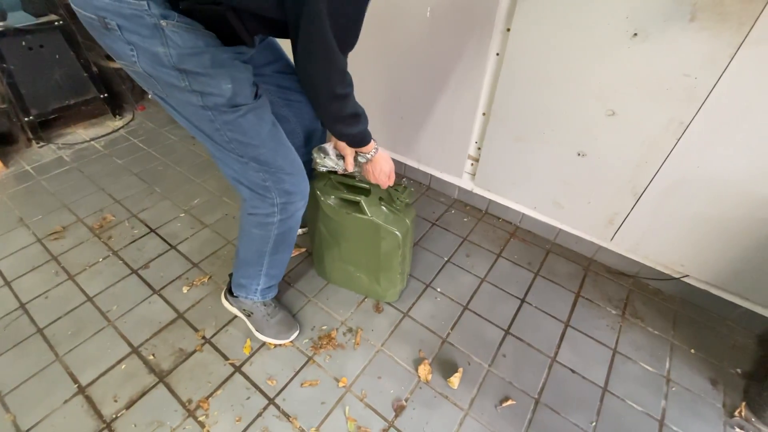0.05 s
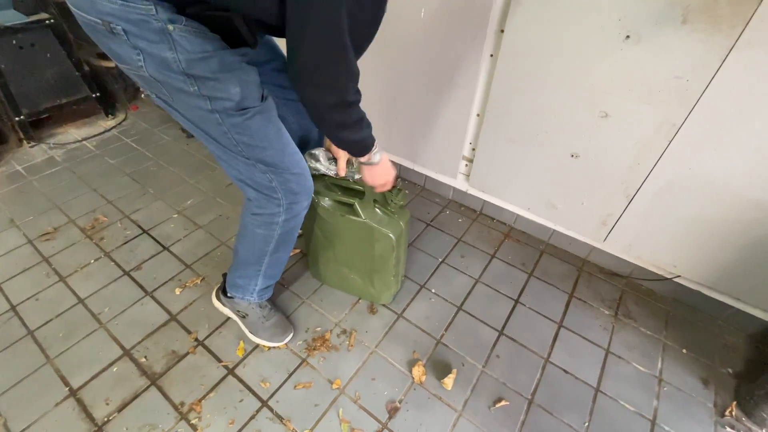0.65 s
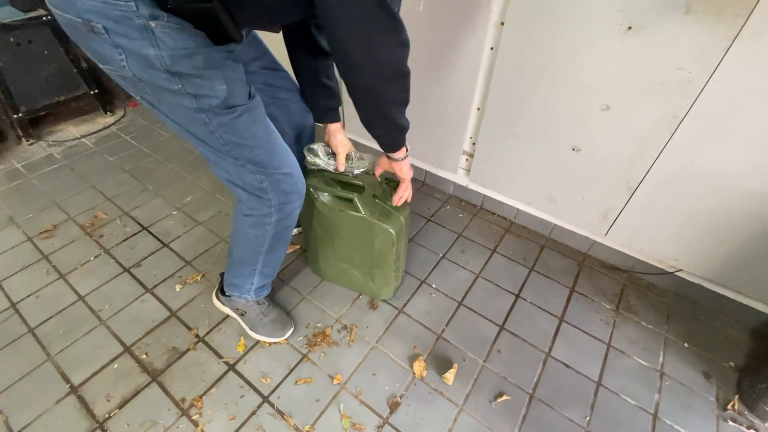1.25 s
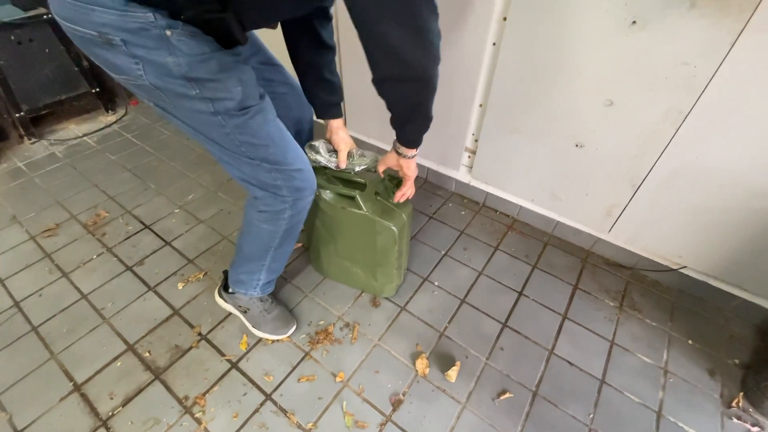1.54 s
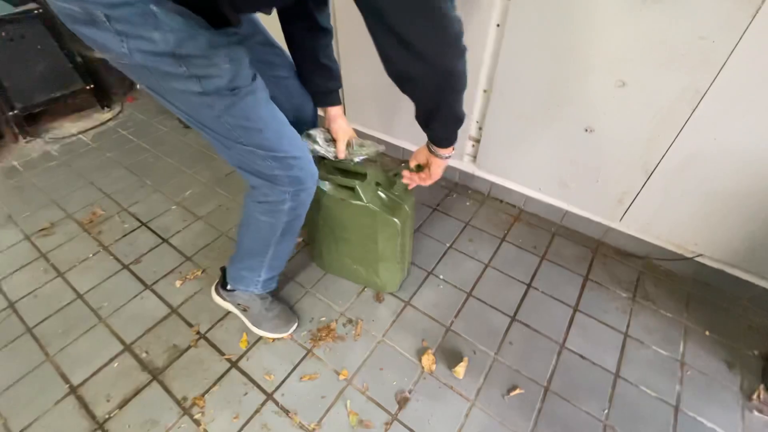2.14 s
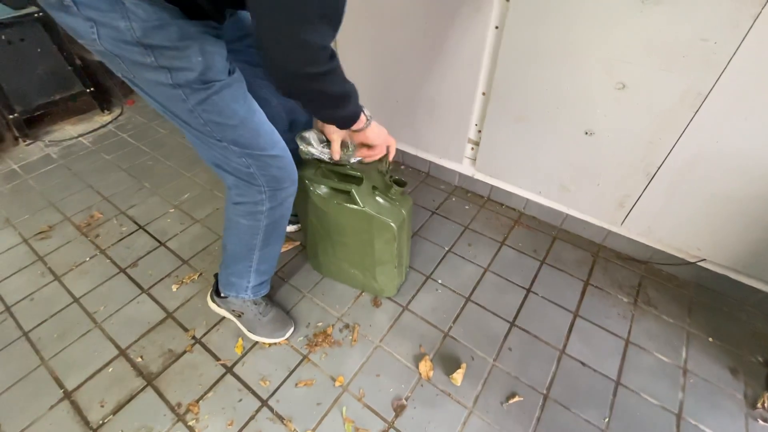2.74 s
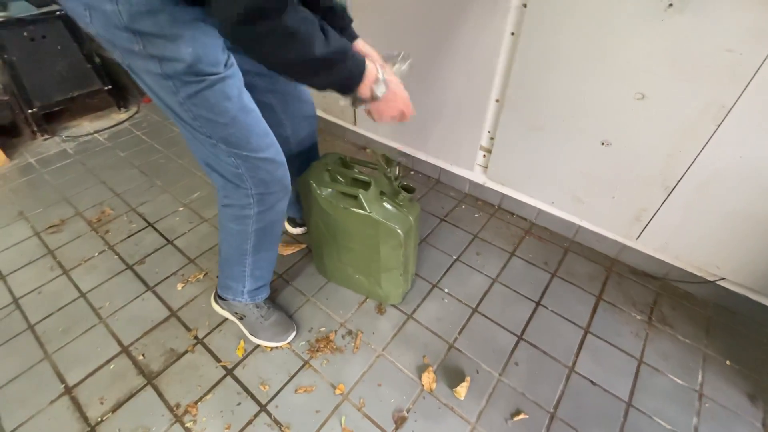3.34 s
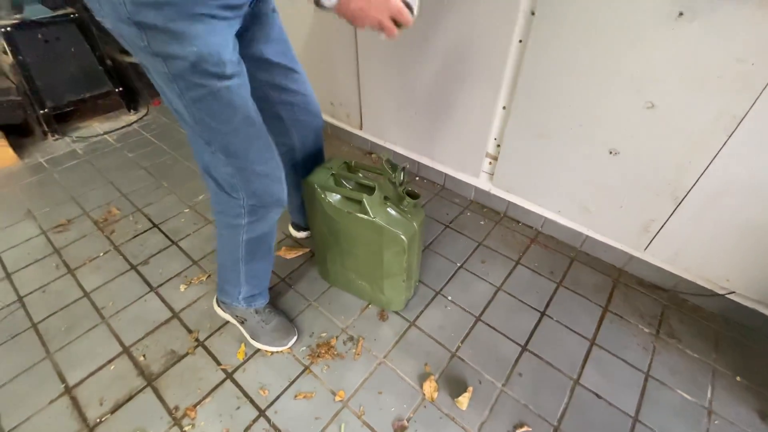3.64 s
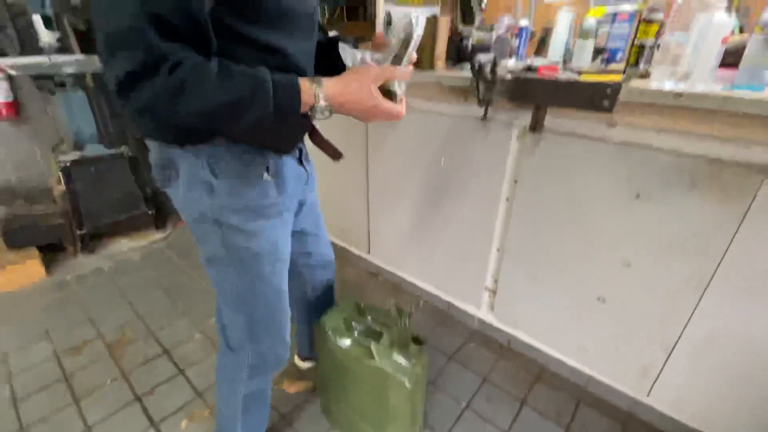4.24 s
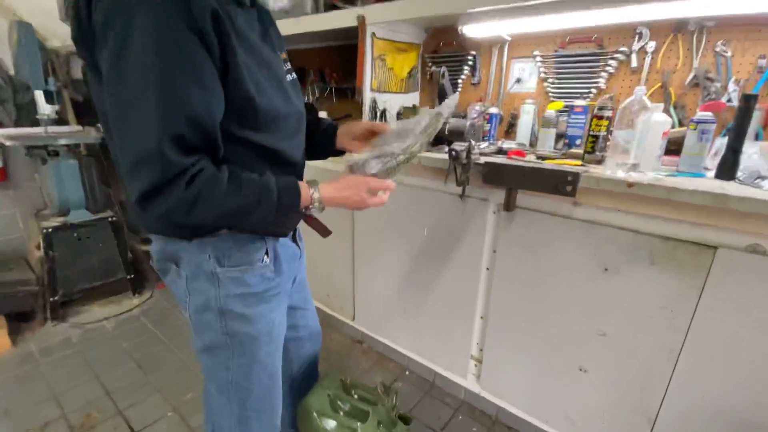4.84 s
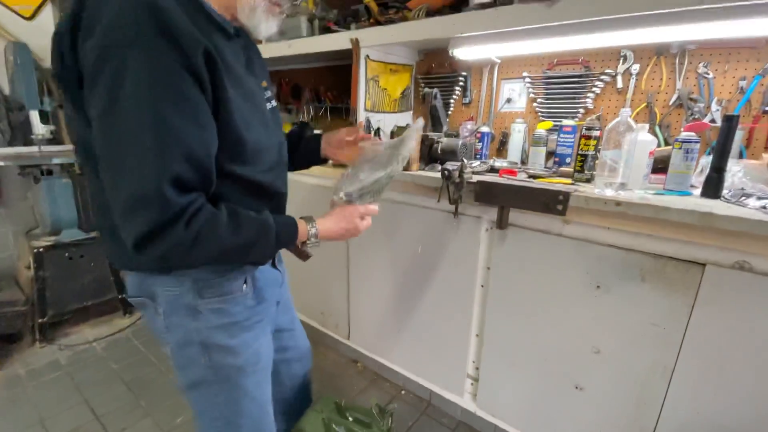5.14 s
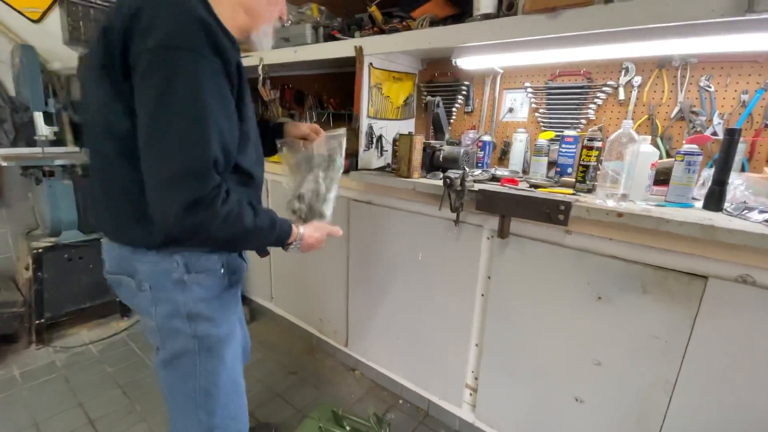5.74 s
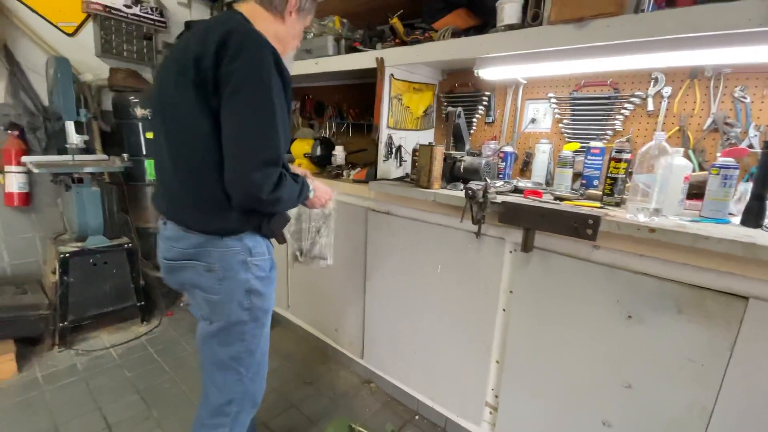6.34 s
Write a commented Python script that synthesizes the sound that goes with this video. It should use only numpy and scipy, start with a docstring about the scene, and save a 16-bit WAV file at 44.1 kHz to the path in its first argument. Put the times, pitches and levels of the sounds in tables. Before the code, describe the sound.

In a quiet tiled workshop, heard from close by, dull bumps and light metallic rattles give way to a few thin squeaks from a jerry can's latch. A short sputtering hiss runs straight into one very loud steel clank that booms and rings away. The loose cap knocks again, more lightly, and the rest is quiet, irregular crinkling and snapping of a thin plastic bag over a faint low room rumble.

```python
"""Opening a steel jerry can

In a tiled workshop with a low rumble, the latch is worked loose with small knocks and thin squeals.
The cap pops, vapour rushes out and the can's wall snaps back with a loud, ringing clank that makes
the limiter turn the sound down. The cap knocks again, then a plastic bag is picked up and crinkles."""
import sys
import numpy as np
from scipy import signal
from scipy.fft import rfft, irfft
from scipy.io import wavfile
from scipy.ndimage import uniform_filter1d, minimum_filter1d

SR = 44100
rng = np.random.default_rng(int(sys.argv[2]) if len(sys.argv) > 2 else 0)


def store_wav(level_fs):
    """Save 16-bit WAV to argv[1]."""
    pcm = np.round(np.clip(np.atleast_2d(level_fs), -1, 1) * 32767)
    wavfile.write(sys.argv[1], SR, pcm.T.astype(np.int16))


N = 285754
T = np.arange(N) / SR


def undb(db):
    """Turn decibels into a gain. Table levels are relative: each source applies its own gain too."""
    return 10 ** (np.asarray(db) / 20)


def unit(x):
    """Scale a signal to an average strength (rms) of 1."""
    return x / np.sqrt(np.mean(x ** 2))


def fade(t, t60):
    """Die away by 60 dB in t60 seconds: the 'fade time' in the tables."""
    return np.exp(-np.log(1000) * t / t60)


def rise(t, rise_s):
    """Grow from 0 towards 1, quickly at first."""
    return 1 - np.exp(-t / rise_s)


def envelope(start, rise_s, hold_s, t60):
    """A loudness shape that rises evenly, holds, then dies away."""
    return np.clip((T - start) / rise_s, 0, 1) * fade(np.maximum(T - start - rise_s - hold_s, 0), t60)


def overlap(gains):
    """The joint gain of unrelated sounds: their powers add up."""
    return np.sqrt(np.sum(np.square(gains), axis=0))


def wobble(n, smooth):
    """A random wiggle, averaged over `smooth` samples: more makes it slower."""
    return unit(uniform_filter1d(rng.standard_normal(n), size=smooth))


def look_up(table, hz, column=1):
    """Read between the rows of a table, on a log-frequency scale."""
    rows = np.array(table)
    return np.interp(np.log(hz + 1e-9), np.log(rows[:, 0]), rows[:, column])


def colour(x, table):
    """Shape the tone with a curve of (frequency [Hz], level [dB]) points."""
    n = x.shape[-1]
    return irfft(rfft(x) * undb(look_up(table, np.fft.rfftfreq(n, 1 / SR))), n)


def add(out, start, x):
    """Mix a sound in at a start time in seconds."""
    i = max(0, int(start * SR))
    out[..., i:i + x.shape[-1]] += x[..., :N - i]


def from_left(x, lag_s=0.00045):
    """Make stereo: sound from the left reaches the right microphone later."""
    return np.array([x, np.pad(x, (int(lag_s * SR), 0))[:len(x)]])


def stereo_noise(n, apart_hz):
    """Noise that is alike on both sides in the bass and mostly unrelated above apart_hz."""
    angle = np.arctan(0.43 + np.fft.rfftfreq(n, 1 / SR) / apart_hz)
    shared = rfft(from_left(rng.standard_normal(n)))
    separate = rfft(rng.standard_normal((2, n)))
    return irfft(np.cos(angle) * shared + np.sin(angle) * separate, n)


def shaped_noise(table, apart_hz, n=N):
    """Stereo noise with the tone of a table, at strength 1."""
    return unit(colour(stereo_noise(n, apart_hz), table))


def dense_ring(table, apart_hz):
    """Countless ringing tones blur into bands of noise, each fading at its own rate."""
    t = T[:2 * SR]
    spectrum = rfft(shaped_noise(table, apart_hz, len(t)))
    hz, centres = np.fft.rfftfreq(len(t), 1 / SR), np.geomspace(50, 15000, 18)
    return sum(irfft(spectrum * np.interp(hz, centres, band)) * fade(t, look_up(table, centre, column=2))
               for centre, band in zip(centres, np.eye(len(centres))))


def steel_tones(table, wander_hz):
    """Fading tones that waver as thin steel flexes; they are complex, and .imag gives the sound."""
    t, knots = T[:3 * SR], np.arange(0, 3, 0.025)
    tones = []
    for hz, db, t60 in table:
        drift = np.cumsum(np.interp(t, knots, rng.standard_normal(len(knots)))) / SR
        tones.append(undb(db) * np.exp(2j * np.pi * (hz * t + wander_hz * drift)) * fade(t, t60))
    return np.array(tones)


def strike(tones):
    """Where a blow lands sets each tone's phase, a little differently at each microphone."""
    phases = rng.uniform(0, 2 * np.pi, len(tones)) + 0.82 * rng.standard_normal((2, len(tones)))
    left, right = np.imag(np.exp(1j * phases) @ tones)
    return np.array([left, from_left(right)[1]])


# the tone of the room's rumble: (frequency [Hz], level [dB])
RUMBLE_TONE = [(20, -39), (35, -13), (58, 0), (85, -9), (120, -10.5), (180, -9.5), (245, -7.5), (400, -11),
               (700, -11.5), (1200, -16.5), (2600, -25), (7500, -33.5), (9500, -35), (11500, -44),
               (14000, -62)]
# electric hum: (pitch [Hz], level [dB])
HUM_TONES = [(120, -63), (240, -61.5)]

def background(rumble_db=-52, swell_db=1):
    """A low, gently swelling rumble with a little mains hum."""
    swell = unit(colour(rng.standard_normal(N), [(3, 0), (12, -40), (50, -120)]))
    hum = sum(undb(db) * np.sin(2 * np.pi * hz * T) for hz, db in HUM_TONES)
    return shaped_noise(RUMBLE_TONE, apart_hz=690) * undb(rumble_db + swell_db * swell) + hum


# the room's echo: (frequency [Hz], level [dB], fade time [s])
ECHO_BANDS = [(60.5, -8.5, 0.58), (503, 4.5, 0.18), (1950, 2.5, 0.341), (6560, 3, 0.46),
              (14400, 4.5, 0.031)]

def workshop(x, echo_db):
    """Tiles and cupboard doors add a short echo."""
    echo = dense_ring(ECHO_BANDS, apart_hz=493) * (T[:2 * SR] > 0.004)  # arrives after 4 ms
    echo = echo / np.sqrt(np.sum(echo ** 2) / 2)
    return x + undb(echo_db) * signal.fftconvolve(x, echo, axes=1)[:, :N]


# shifts of body weight: (time [s], rise [s], hold [s], level [dB])
WEIGHT_SHIFTS = [(0.0, 0.07, 0.15, -40.5), (0.204, 0.0324, 0.172, -39), (0.506, 0.051, 0.443, -44.5),
                 (1.089, 0.04, 0.03, -41.5), (1.253, 0.026, 0.43, -44.5), (2.965, 0.056, 0.31, -46),
                 (3.652, 0.045, 0.03, -53), (5.45, 0.11, 1, -54.5)]
# their dull tone: (frequency [Hz], level [dB])
THUD_TONE = [(25, -28), (50, 16.5), (85, 11), (135, 20), (190, 3), (250, 19), (400, -30)]

def shifting_weight(gain_db=-4, t60=0.66):
    """Shoes and knees press on the floor and the can, making dull rumbles."""
    weight = overlap([undb(db) * envelope(start, rise_s, hold_s, t60)
                      for start, rise_s, hold_s, db in WEIGHT_SHIFTS])
    return shaped_noise(THUD_TONE, apart_hz=910) * weight * undb(gain_db)


# grips and folds of the bag: (time [s], rise [s], hold [s], crinkle level [dB], sleeve level [dB])
BAG_MOVES = [(3.257, 0.018, 0.0113, -76, -62), (3.368, 0.0096, 0.25, -62.5, -54.5),
             (3.696, 0.017, 0.3, -55, -52), (4.07, 0.017, 0.013, -48.5, -45),
             (4.269, 0.017, 0.043, -57, -55), (4.45, 0.01, 0.32, -65, -80),
             (4.738, 0.073, 0.036, -47.5, -47), (4.937, 0.0185, 0.034, -63.5, -73),
             (5.402, 0.04, 0.059, -51.5, -48.5), (5.561, 0.0114, 0.04, -55.5, -52),
             (5.714, 0.012, 0.092, -57, -53.5), (5.884, 0.015, 0.034, -64, -55),
             (6.1, 0.0086, 0.022, -53, -48.5), (6.237, 0.024, 0.043, -69, -52),
             (6.434, 0.037, 0.03, -70, -50.5)]
# the tone of thin plastic: (frequency [Hz], level [dB])
PLASTIC_TONE = [(500, -30), (1300, 0), (2200, -0.5), (3000, 0.5), (4500, -6.5), (7000, -2.5), (10000, -3.5),
                (13000, -3.5), (15000, -32)]
# the tone of rustling sleeves: (frequency [Hz], level [dB])
SLEEVE_TONE = [(100, 18), (250, -1), (700, 8.5), (1300, 3), (2500, -7), (5000, -11)]

def bag(creases_per_s=450, crinkle_db=-2, slide_db=-11, sleeve_db=-2):
    """As the hands move, creases of many pitches and sizes snap at random; plastic and sleeves slide."""
    flexing = overlap([undb(db) * envelope(start, rise_s, hold_s, t60=0.42)
                       for start, rise_s, hold_s, db, _ in BAG_MOVES])
    rubbing = overlap([undb(db) * envelope(start, rise_s, hold_s, t60=0.28)
                       for start, rise_s, hold_s, _, db in BAG_MOVES])
    creases, pitches = np.zeros((2, N)), np.geomspace(1500, 13000, 16)
    for hz in pitches:
        sizes = undb(3 * np.minimum(rng.exponential(size=N), 3))
        snapping = rng.random(N) < creases_per_s / len(pitches) / SR
        kicks = sizes * snapping * rng.choice([-1, 1], N)
        ring = signal.lfilter(*signal.iirpeak(hz, Q=8, fs=SR), kicks)
        creases += np.array([ring, np.roll(ring, rng.integers(5, 25))])  # later on the right
    crinkle = undb(crinkle_db) * unit(colour(creases, PLASTIC_TONE))
    slide = undb(slide_db) * shaped_noise(PLASTIC_TONE, apart_hz=2000)
    sleeves = undb(sleeve_db) * shaped_noise(SLEEVE_TONE, apart_hz=850)
    return (crinkle + slide) * flexing + sleeves * rubbing


# the bag's larger creases: (time [s], level [dB], pitch [Hz])
CREASE_POPS = [(3.477, -42.5, 3020), (3.552, -47, 3690), (3.588, -51, 3000), (3.68, -46, 3050),
               (3.722, -39, 3220), (3.786, -43, 2770), (3.796, -46, 3920), (3.844, -43.5, 4640),
               (3.9594, -39, 2970), (4.042, -41, 3000), (4.067, -49, 2600), (4.09, -38.5, 3010),
               (4.1365, -49, 2900), (4.821, -36, 3050), (5.306, -48, 2500), (5.3144, -51, 1910),
               (5.322, -46, 2970), (5.4324, -38, 2860), (5.456, -56, 3300), (5.812, -47, 2920)]

def bag_pops():
    """A crease flips over and the plastic around it rings briefly."""
    out, t = np.zeros((2, N)), T[:SR // 10]
    shape = rise(t, 0.00099) * fade(t, 0.025)
    for start, db, hz in CREASE_POPS:
        ring = signal.lfilter(*signal.iirpeak(hz, Q=4, fs=SR), stereo_noise(len(t), apart_hz=9000))
        add(out, start, undb(db) * unit(ring) * shape)
    return out


# small clicks of latch and bag: (time [s], edge level [dB], crackle level [dB])
CLICKS = [(0.226, -46, -56), (0.625, -47, -59), (0.9694, -47, -58), (0.983, -45, -54.5), (2.136, -50, -64),
          (2.2145, -51.5, -60), (2.7391, -54, -55.5), (2.779, -53, -55), (2.861, -42, -48.5),
          (2.88, -49, -44), (3.083, -58, -59), (3.275, -63, -59), (3.3821, -44, -55.5), (3.42, -42, -55),
          (3.5524, -52, -58), (3.614, -32.5, -68), (3.721, -53, -51.5), (3.845, -50, -65),
          (3.896, -51, -49.5), (3.961, -44, -49.5), (4.0815, -33, -56), (4.137, -38, -54.5),
          (4.466, -50, -54), (4.628, -39.5, -55), (4.737, -52, -51), (4.784, -47, -59),
          (5.3884, -43.5, -54), (5.518, -38, -58), (5.72, -43, -51.5), (5.9045, -51.5, -64),
          (5.918, -48, -53), (6.0754, -46, -63), (6.113, -45, -65)]
# the tone of the crackle, and of the hinge's hiss below: (frequency [Hz], level [dB])
CRACKLE_TONE = [(600, -9), (1500, -4.5), (3000, 0.5), (5000, -1.5), (9000, -2.5), (14000, -13)]

def clicks(edge_gain_db=1, crackle_gain_db=5.5):
    """Latch and bag give single snaps: a very short bright edge with a brief crackle."""
    out, t = np.zeros((2, N)), T[:SR // 10]
    for start, edge_db, crackle_db in CLICKS:
        crackle = shaped_noise(CRACKLE_TONE, apart_hz=4000, n=len(t)) * fade(t, 0.05)
        edge = unit(np.diff(rng.standard_normal((2, len(t))), prepend=0)) * fade(t, 0.023)
        snap = undb(crackle_db + crackle_gain_db) * crackle + undb(edge_db + edge_gain_db) * edge
        add(out, start, snap * rise(t, 0.00062))
    return out


# swings of the cap on its hinge: (time [s], rise [s], hold [s], level [dB])
HINGE_SWINGS = [(0.42, 0.006, 0.02, -61), (1.805, 0.012, 0.012, -34.5), (2.21, 0.006, 0.01, -63)]

def hinge_scrapes():
    """Steel slides on steel in the hinge with a short hiss."""
    rubbing = overlap([undb(db) * envelope(start, rise_s, hold_s, t60=0.27)
                       for start, rise_s, hold_s, db in HINGE_SWINGS])
    return shaped_noise(CRACKLE_TONE, apart_hz=3000) * rubbing


# pushes on the latch: (time [s], length [s], top base pitch [Hz], time to the top [s],
# pitch lost by the end [share], level [dB], pitch shake at the end [share])
LATCH_PUSHES = [(0.733, 0.19, 1003, 0.085, 0.035, -51, 0.012),
                (1.093, 0.24, 1027, 0.054, 0.102, -47.5, 0.025),
                (1.482, 0.18, 987, 0.091, 0.078, -48.5, 0.03),
                (2.288, 0.28, 992, 0.067, 0.033, -54.5, 0.056)]
# the tones in a squeal: (pitch [times the base], level [dB], loudest point [share of the length],
# how much of the pitch slide it follows [share])
SQUEAL_TONES = [(2, -14.5, 0.57, 1), (3, -10.5, 0.31, 0.5076), (4, -5, 0.27, 1), (5, -25, 0.82, 0.31),
                (8, -13.5, 0.26, 1)]

def latch_squeal(gain_db=-2, rasp_db=4, rise_s=0.012, t60=0.12):
    """Thin whistles climb, then sag; as the grip slackens they roughen and a second whistle splits off."""
    out = np.zeros(N)
    for start, length_s, top_hz, top_s, sag, db, shake in LATCH_PUSHES:
        now = (T > start) & (T < start + length_s + t60)
        t = T[now] - start
        progress = np.minimum(t / length_s, 1)
        climbing = 0.0344 * np.maximum(1 - t / top_s, 0) ** 2
        sagging = sag * np.clip((t - top_s) / (length_s - top_s), 0, 1.1) ** 1.5
        below_top = climbing + sagging
        loudness = undb(db + gain_db) * envelope(start, rise_s, length_s - rise_s, t60)[now]
        # each whistle: (pitch lift [share], gain)
        first, second = (0, 1), (0.06 * progress ** 3, undb(-4) * progress ** 2)
        for lift, gain in (first, second):
            jitter = shake * (0.25 + 0.75 * progress ** 2) * wobble(len(t), smooth=110)
            for multiple, tone_db, loudest, follows in SQUEAL_TONES:
                hz = multiple * top_hz * (1 - follows * (below_top - lift) + jitter)
                tone = undb(tone_db) * np.sin(2 * np.pi * np.cumsum(hz) / SR)
                rasp = unit(undb(rasp_db * wobble(len(t), smooth=400)))
                swell = np.exp(-((progress - loudest) / 0.36) ** 2)
                out[now] += gain * loudness * swell * rasp * tone
    return from_left(out)


# the tone of rubbing steel: (frequency [Hz], level [dB])
RUB_TONE = [(1500, -8), (2200, -12), (2600, -17.5), (3000, -1), (3400, -17), (3900, 3), (4200, -6),
            (4600, -17), (5200, -13.5), (6800, -14), (7800, -12.5), (9500, -27.5)]

def latch_rub(gain_db=-9):
    """Under each squeal the steel rubs with a breathy rasp that grows through the push."""
    pushes = overlap([undb(db + gain_db) * envelope(start, 0.8 * length_s, 0.2 * length_s, t60=0.27)
                      for start, length_s, _, _, _, db, _ in LATCH_PUSHES])
    return shaped_noise(RUB_TONE, apart_hz=3000) * pushes


# the latch lever jolts against its mounts: (time [s], level [dB])
LEVER_JOLTS = [(0.214, -43), (0.27, -46.5), (0.323, -43.5), (0.418, -34.5), (0.464, -41), (0.497, -37.5),
               (2.841, -45)]
# the ring of the lever and the can's shoulder: (pitch [Hz], level [dB], fade time [s])
LEVER_TONES = [(128.5, -17, 0.37), (166, -5, 1.1), (258.6, -8, 1.1), (641, -11, 0.64), (1044, -3, 0.2),
               (1118, -9.5, 0.24), (1412, -12.5, 0.39), (1507, -18.5, 0.51), (1760, -17.5, 0.68),
               (1830, -19.5, 0.5), (1911, -15.5, 0.57), (2110, -18, 0.42), (2180, -13, 0.35),
               (2257, -20, 0.21)]

def latch_lever():
    """Each jolt rings the lever and thumps the shoulder of the can that carries it."""
    out, tones = np.zeros((2, N)), steel_tones(LEVER_TONES, wander_hz=5)
    for start, db in LEVER_JOLTS:
        add(out, start, undb(db) * strike(tones))
    return out


# the loose cap hits the can's neck: (time [s], level [dB])
CAP_HITS = [(0.217, -51), (0.419, -31), (0.448, -43), (0.495, -36), (1.81, -17), (1.857, -8), (1.884, -4.5),
            (1.902, -16), (1.94, -27), (1.972, -23), (2.017, -27), (2.05, -31), (2.185, -37), (2.221, -28),
            (2.254, -26), (2.413, -35.5), (2.882, -25), (2.889, -32), (2.91, -44), (2.923, -30),
            (2.937, -30)]
# the tone of one clack: (frequency [Hz], level [dB])
CLACK_TONE = [(100, -6), (240, 8), (520, 1.5), (850, 9.5), (1100, 6), (1400, -22), (2200, -25), (3200, -42),
              (5500, -45), (10000, -58)]

def cap_clacks(gain_db=1):
    """The cap chatters on its hinge; each hit is a short, dry burst of noise."""
    out, t = np.zeros((2, N)), T[:SR // 5]
    shape = rise(t, 0.00043) * fade(t, 0.026)
    for start, db in CAP_HITS:
        burst = shaped_noise(CLACK_TONE, apart_hz=2510, n=len(t))
        add(out, start, undb(db + gain_db) * burst * shape)
    return out


# spurts of vapour as the cap lifts: (time [s], level [dB], fade time [s])
SPURTS = [(1.661, -18, 0.17), (1.721, -20.5, 0.26)]
# the tone of the jet: (frequency [Hz], level [dB])
JET_TONE = [(100, -32), (400, 0), (720, 8.5), (1300, -7.5), (2600, -8), (4300, -16), (5800, -11),
            (8000, -11.5), (12000, -13), (14000, -20)]

def vapour(rise_s=0.0037, empty_at_s=1.772, flutter_db=3, gulp_db=-22.5, high_hz=299.4, low_hz=161.2):
    """A sputtering jet leaves the neck, with an unsteady gulp that sinks as the pressure falls."""
    start = SPURTS[0][0]
    pressure = envelope(start, rise_s, empty_at_s - start, t60=0.22)
    spurts = overlap([undb(db) * envelope(time, rise_s, 0, t60) for time, db, t60 in SPURTS])
    flutter = undb(flutter_db * wobble(N, smooth=120))
    jet = shaped_noise(JET_TONE, apart_hz=3000) * flutter * spurts * pressure
    gulp_hz = low_hz + (high_hz - low_hz) / (1 + ((T - start) / 0.039) ** 6)  # halfway down in 39 ms
    gulp_hz *= 1 + 0.09 * wobble(N, smooth=250)
    sputter = undb(flutter_db * wobble(N, smooth=400))
    gulp = unit(sputter * np.sin(2 * np.pi * np.cumsum(gulp_hz) / SR))
    gulp *= undb(gulp_db) * envelope(start, rise_s=0.021, hold_s=0.0427, t60=0.75)
    return jet + from_left(gulp)


# low swings of the can's broad side: (time [s], pitch [Hz], level [dB], fade time [s])
BOOM_SWINGS = [(1.803, 84.7, -28, 3.4), (2.131, 83.6, -31, 0.95), (2.2, 125, -31.5, 0.9),
               (2.201, 142.3, -32.5, 0.65), (2.199, 221.5, -39.5, 1), (2.199, 256.7, -38.5, 0.86)]

def wall_boom(waver_db=3, rise_s=0.084):
    """The broad side booms after the snap and again as it settles, dying away unevenly."""
    out = np.zeros(N)
    for start, *swing in BOOM_SWINGS:
        tone = steel_tones([swing], wander_hz=2).imag[0]
        noise = rng.standard_normal(len(tone))
        waver = unit(colour(noise, [(1, -20), (4, 0), (9, 0), (20, -40), (50, -120)]))
        add(out, start, tone * undb(waver_db * waver) * rise(T[:len(tone)], rise_s))
    return from_left(out)


# short, heavy swings of the wall: (time [s], pitch [Hz], level [dB], fade time [s])
WALL_SWINGS = [(0.25, 83.35, -34.5, 0.264), (0.441, 132, -24, 0.14), (1.7784, 265, 11, 0.031),
               (1.7745, 655.3, 0.5, 0.11), (1.783, 431, -7, 0.12), (1.797, 950, -8, 0.077),
               (1.806, 92, 1.5, 0.065), (1.824, 1520, -8.5, 0.11)]

def wall_snap(rise_s=0.0085):
    """The wall flexes under the latch; later, freed of its pressure, it gathers speed and snaps inward."""
    out = np.zeros(N)
    for start, *swing in WALL_SWINGS:
        tone = steel_tones([swing], wander_hz=3.5).imag[0]
        add(out, start, tone * rise(T[:len(tone)], rise_s))
    return from_left(out) * undb([[2], [-2]])  # louder on the left


# blows on the can: (time [s], level [dB], treble cut above [Hz], cap level within the blow [dB])
CAN_BLOWS = [(0.0, -34.5, 264, -10), (0.213, -38, 2300, -24.5), (0.345, -30, 170, -27),
             (0.417, -35.5, 4300, -18), (0.447, -32, 478, -17), (1.656, -30.5, 985, -20),
             (1.664, -26, 5000, -2.5), (1.776, -11.5, 1430, -13), (1.80, -13.5, 1710, -12),
             (1.829, -19.5, 3580, -27), (1.853, -16.5, 3420, -32), (1.883, -21.5, 1500, -27),
             (2.016, -32.5, 1810, -25), (2.12, -36.5, 1107, -22), (2.186, -41.5, 1330, -23),
             (2.22, -40, 1446, -13), (2.844, -44.5, 2060, -11.5), (2.881, -38, 3000, 7.5),
             (2.91, -36, 2170, 2.5)]
# the can's clear ringing tones: (pitch [Hz], level [dB], fade time [s])
CAN_TONES = [(120.2, -13, 0.52), (214, -22, 1.15), (255, -11, 0.22), (362, -16.5, 1.7), (425, -12, 0.59),
             (479, -16, 0.59), (515.7, -16, 1.54), (556, -14.5, 0.98), (656, -10.5, 1.55),
             (683, -10.5, 0.92), (726, -14.5, 1.74), (763, -11, 1.56), (822, -11, 1.36), (985, -8, 1.22),
             (1081, -8.5, 1.03), (1323, -16.5, 1.53), (1343, -15, 1), (1526, -30, 1.3), (1517, -13, 1.09),
             (1580, -18, 0.63), (1670, -13, 1), (1730, -26, 0.7), (2160, -16, 0.39)]
# the ring of the cap and its latch: (pitch [Hz], level [dB], fade time [s])
CAP_TONES = [(217.4, -5.5, 0.51), (243.8, -6.5, 0.77), (329.6, -15, 1.73), (431, -13.5, 0.81),
             (518.3, -7, 0.75), (699, -9, 1.2), (741, -14, 1.05), (885, -4.5, 0.3), (978.4, 0, 0.43),
             (1008, -3.5, 0.92), (1110, -22, 0.8), (1130, -21, 0.25), (1497, -21, 1.5), (1530, -28, 0.5),
             (1870, -19, 0.8), (1997, -15, 0.63), (2019, -23, 0.47), (2320, -24, 0.69), (2480, -23, 0.57)]
# the sheet steel's crowd of weaker tones: (frequency [Hz], level [dB], fade time [s])
SHEET_BANDS = [(49.7, -11, 0.44), (127, 0.5, 0.14), (264, -8, 1.14), (440, -8.5, 1.5), (691, -2, 1.29),
               (1035, -4.5, 1.16), (1520, -9.5, 1), (2200, -11.5, 0.83), (3700, -21.5, 0.53),
               (5630, -35, 0.5), (12800, -16, 0.53)]

def can_clanks(shell_db=-2):
    """Every blow rings the same steel shell and cap; a soft contact leaves out the treble."""
    out = np.zeros((2, N))
    shell, cap = steel_tones(CAN_TONES, wander_hz=6), steel_tones(CAP_TONES, wander_hz=9)
    for start, db, cut_hz, cap_db in CAN_BLOWS:
        ring = undb(shell_db) * strike(shell) + undb(cap_db) * strike(cap)
        add(ring, 0, dense_ring(SHEET_BANDS, apart_hz=1120))
        treble_cut = signal.butter(2, cut_hz, fs=SR, output="sos")
        add(out, start, undb(db) * signal.sosfilt(treble_cut, ring))
    return out * undb([[-0.5], [0.5]])  # slightly louder on the right


# what the left microphone gains over the right: (frequency [Hz], boost [dB])
LEFT_BOOST = [(60, 1), (200, 1.5), (400, 3), (700, 5.5), (1300, 6), (2400, 5.5), (4400, 6), (8000, 2.5),
              (14000, -4)]

def scene():
    """All sources in the room; the left microphone faces them and hears more of the middle range."""
    can = can_clanks() + workshop(wall_snap(), echo_db=-2.5)
    can += workshop(vapour(), echo_db=-3.5) + wall_boom()
    cap = workshop(cap_clacks(), echo_db=-11) + workshop(latch_lever() + hinge_scrapes(), echo_db=-6)
    small_sounds = workshop(clicks() + bag_pops() + latch_squeal() + latch_rub(), echo_db=-4)
    crinkling = workshop(bag(), echo_db=-0.5)
    left, right = can + cap + small_sounds + crinkling + shifting_weight() + background()
    return np.array([colour(left, LEFT_BOOST), right])


def record(dry, bass_cut_hz=35, top_hz=13900, hold_s=0.23, release_db_per_s=38):
    """Cut the deep bass; a limiter turns peaks down at once, holds, then lets go; cut the top treble."""
    dry = signal.sosfilt(signal.butter(3, bass_cut_hz, "high", fs=SR, output="sos"), dry)
    peak_db = 20 * np.log10(np.abs(dry).max(axis=0) + 1e-9)
    needed_db = np.minimum(0, -peak_db)
    half_hold = int(hold_s * SR / 2)
    held_db = minimum_filter1d(needed_db, 2 * half_hold + 1, origin=half_hold)
    ramp_db = release_db_per_s * T
    gain_db = np.minimum.accumulate(held_db - ramp_db) + ramp_db  # recovers no faster than the ramp
    limited = np.clip(dry * undb(uniform_filter1d(gain_db, size=40)), -1, 1)
    return signal.sosfilt(signal.ellip(8, 0.2, 70, top_hz, fs=SR, output="sos"), limited)


dry = scene()
out = record(dry)
store_wav(out)
```